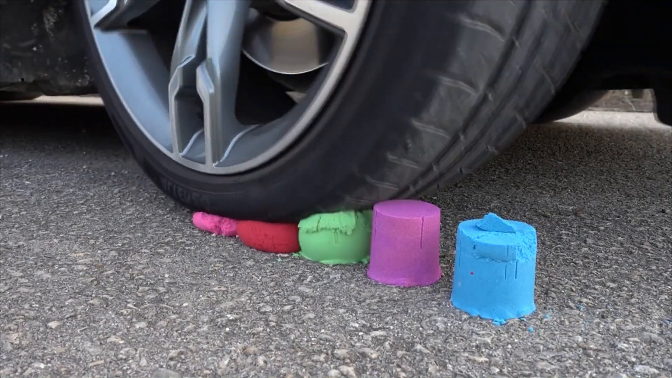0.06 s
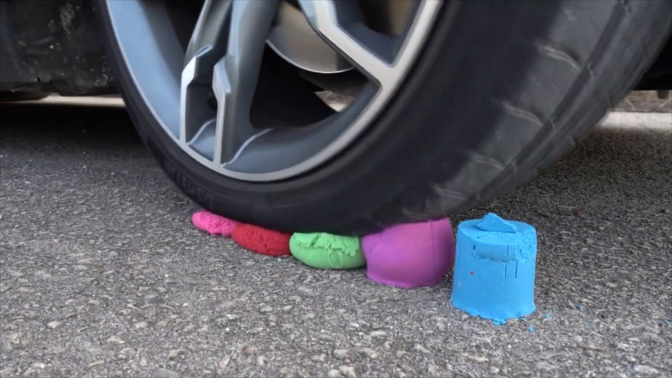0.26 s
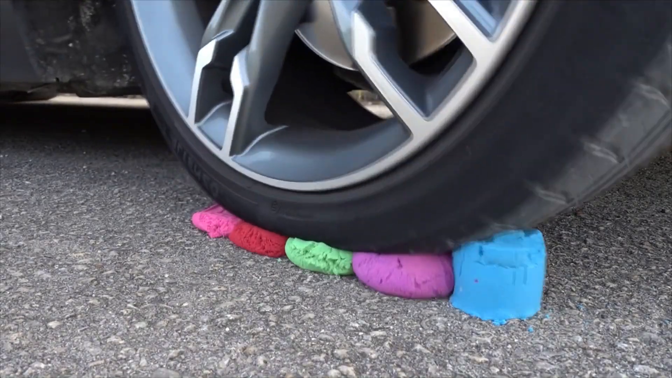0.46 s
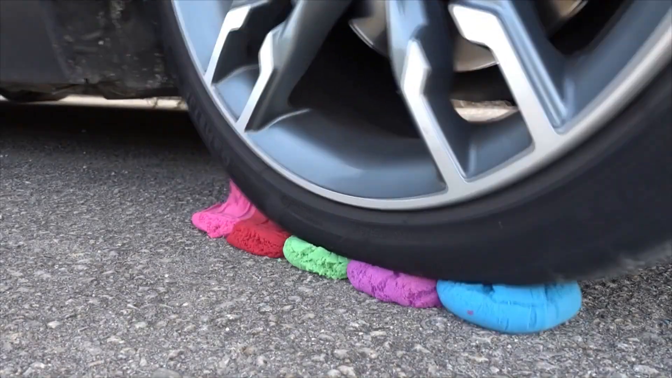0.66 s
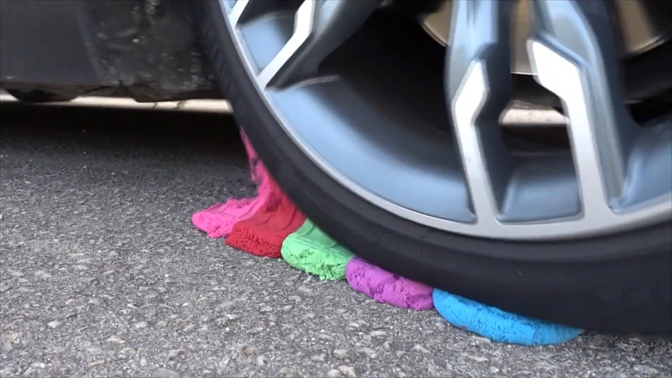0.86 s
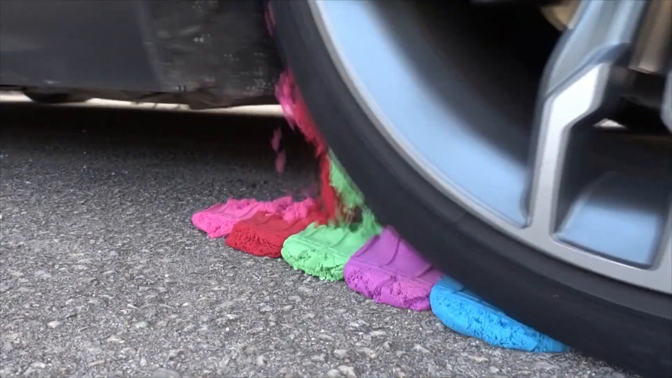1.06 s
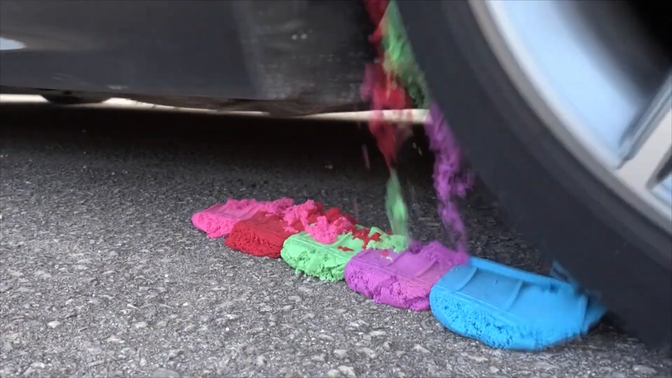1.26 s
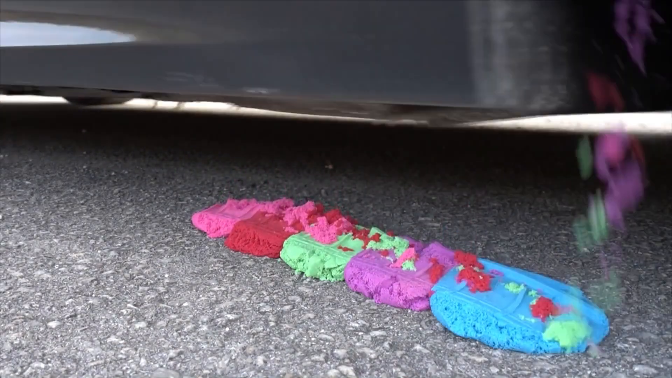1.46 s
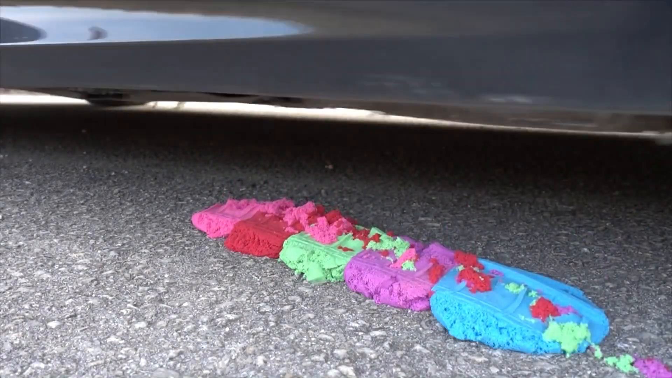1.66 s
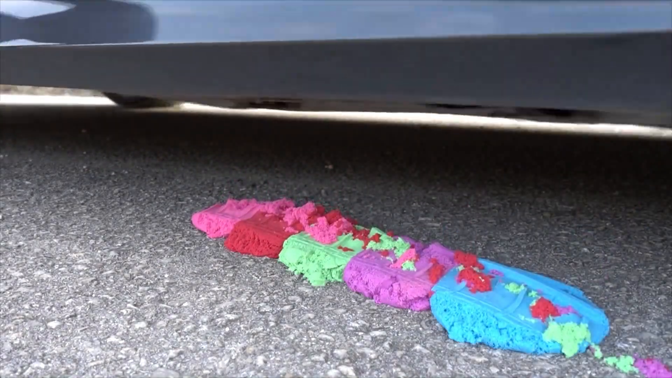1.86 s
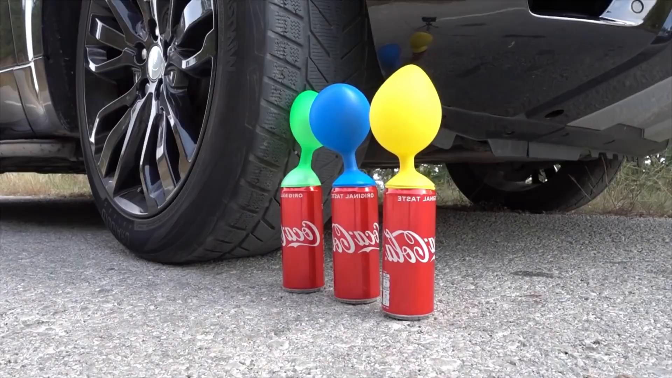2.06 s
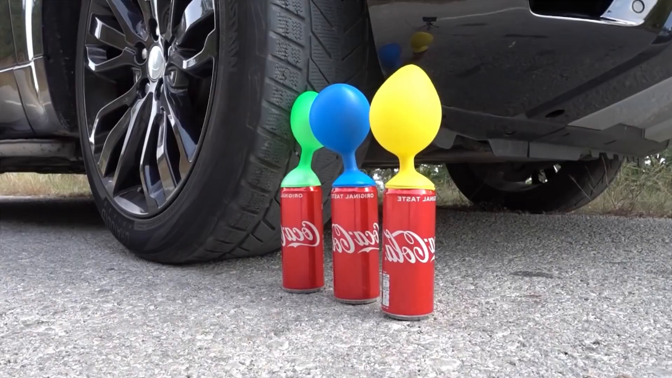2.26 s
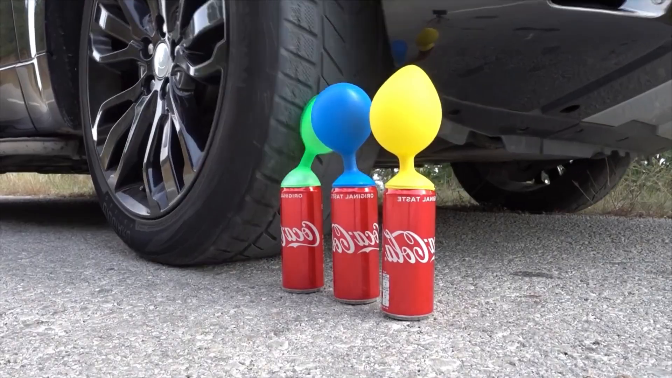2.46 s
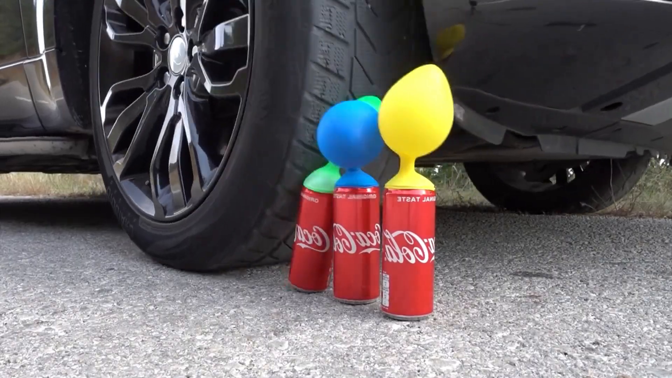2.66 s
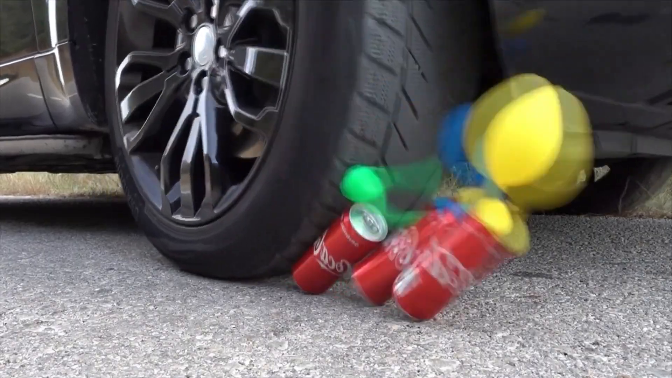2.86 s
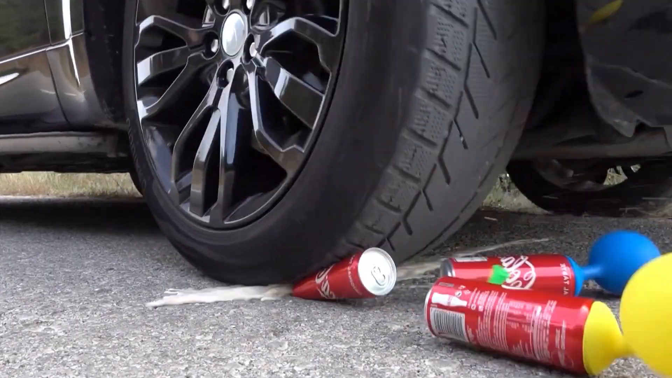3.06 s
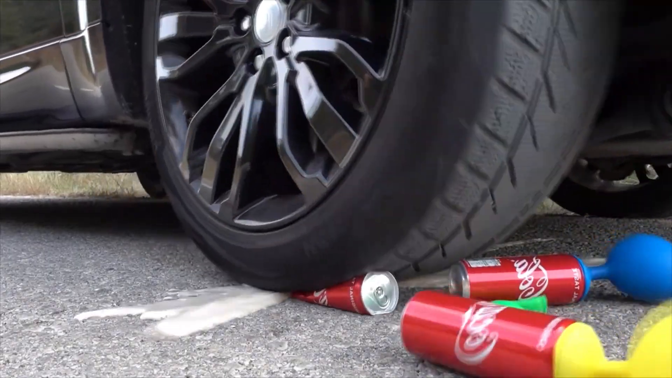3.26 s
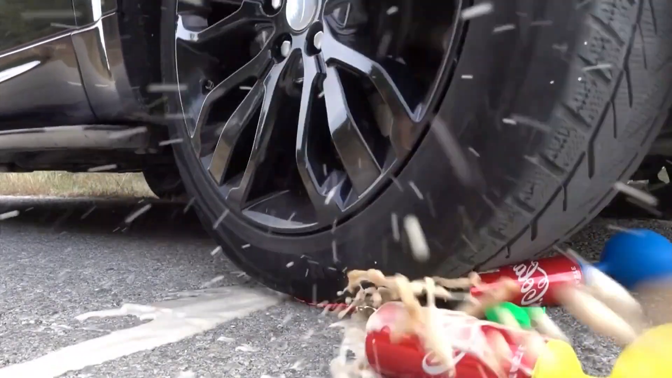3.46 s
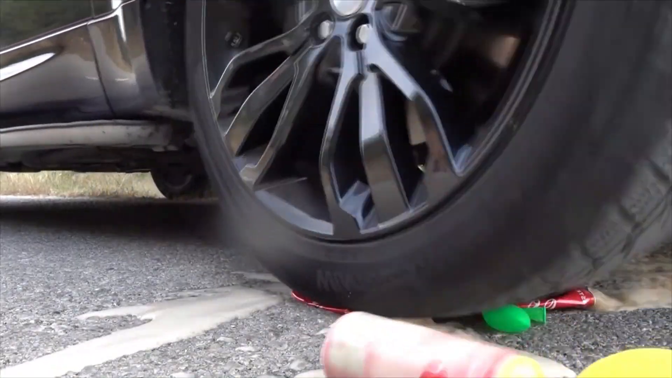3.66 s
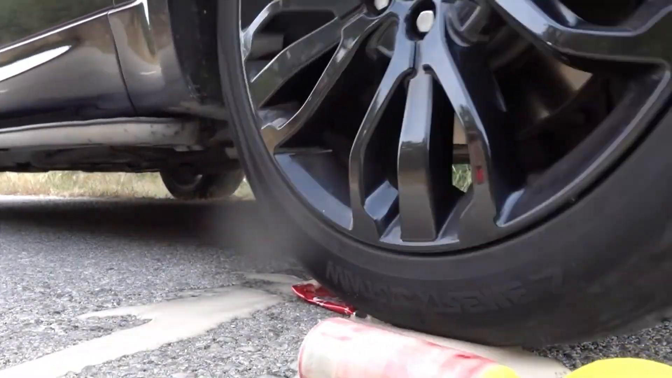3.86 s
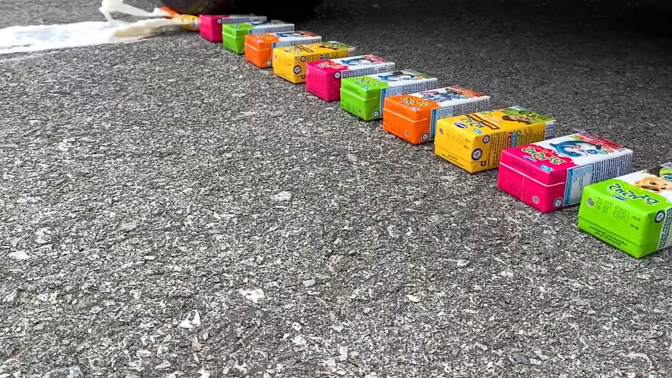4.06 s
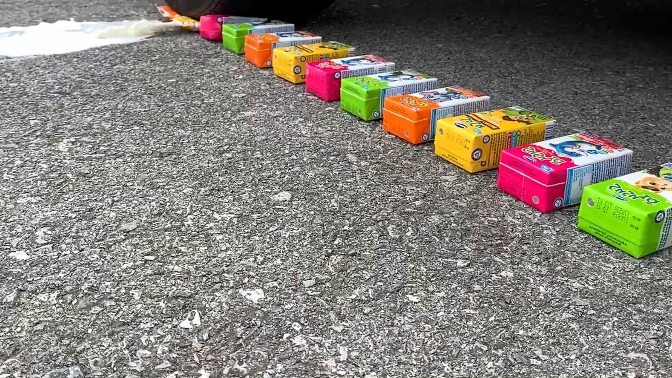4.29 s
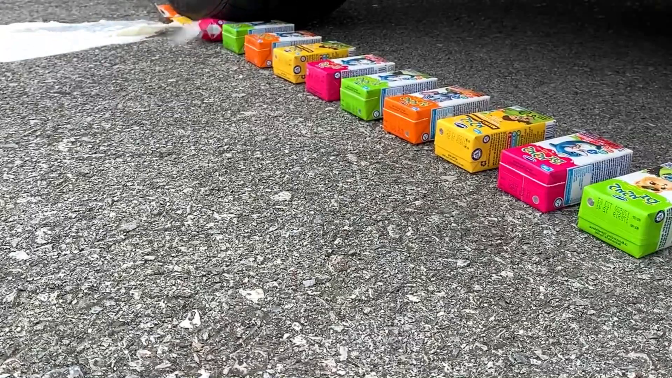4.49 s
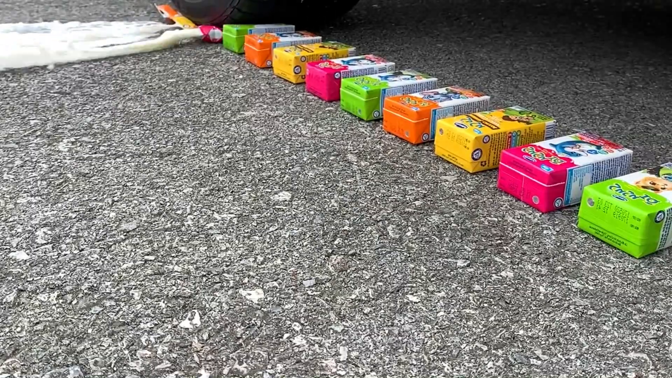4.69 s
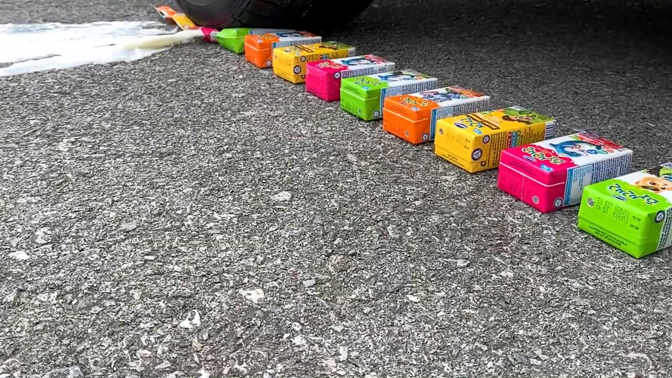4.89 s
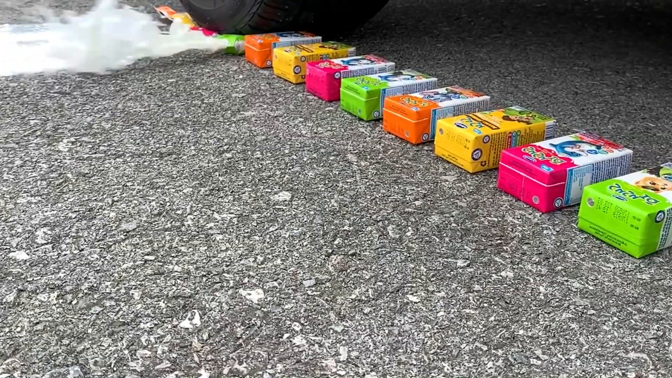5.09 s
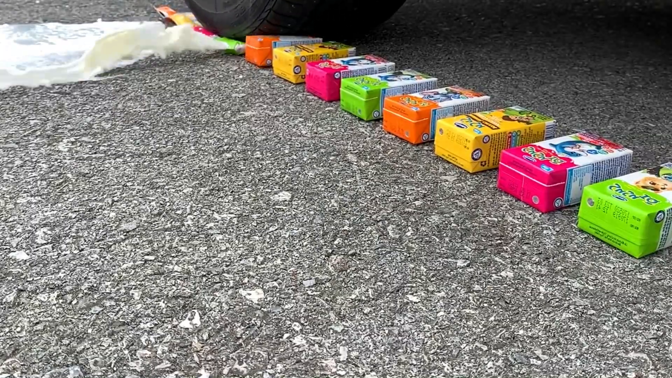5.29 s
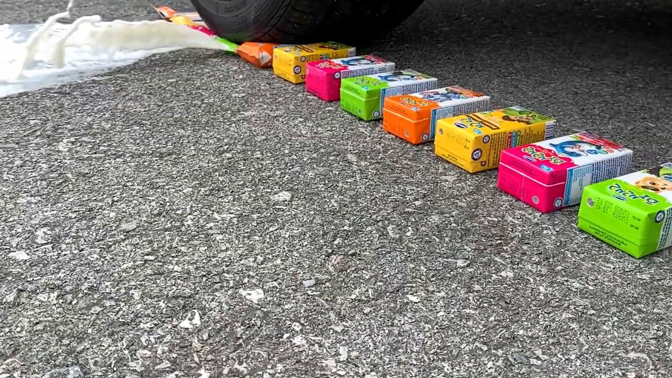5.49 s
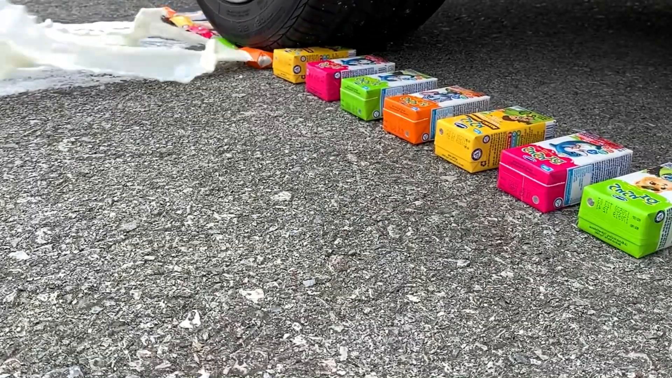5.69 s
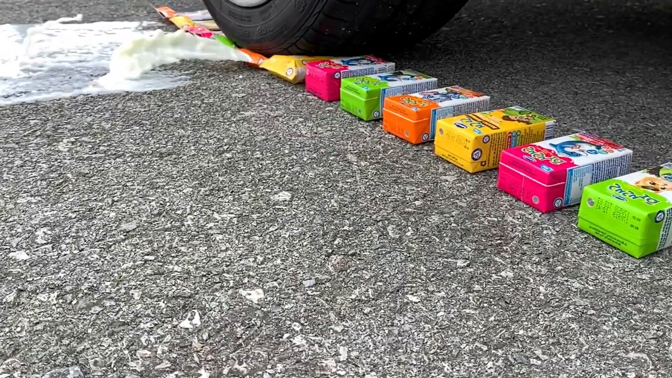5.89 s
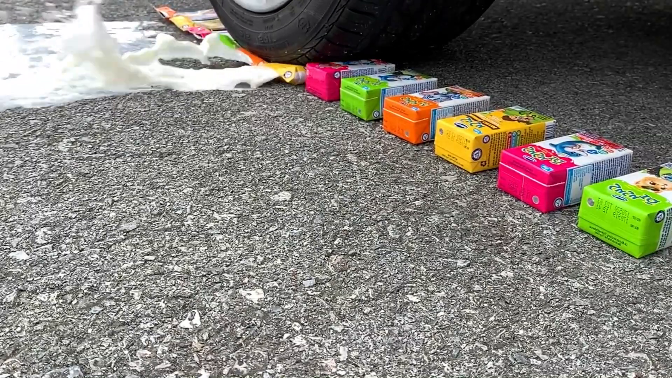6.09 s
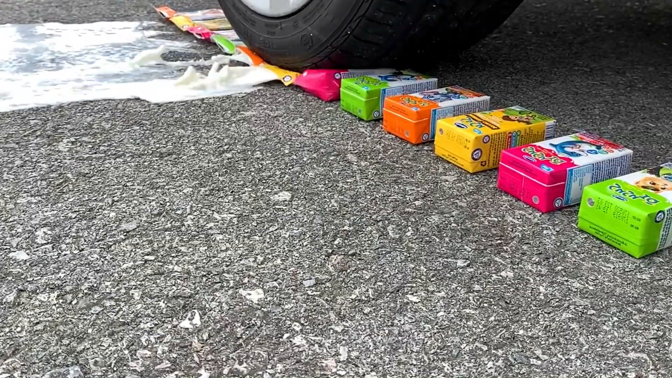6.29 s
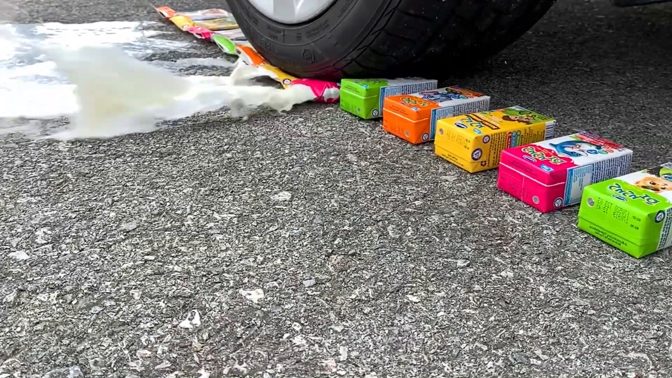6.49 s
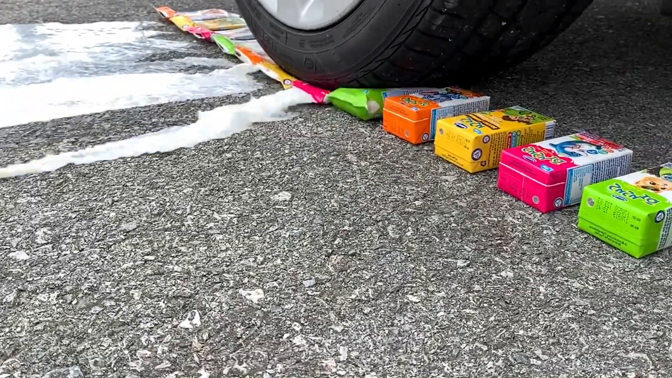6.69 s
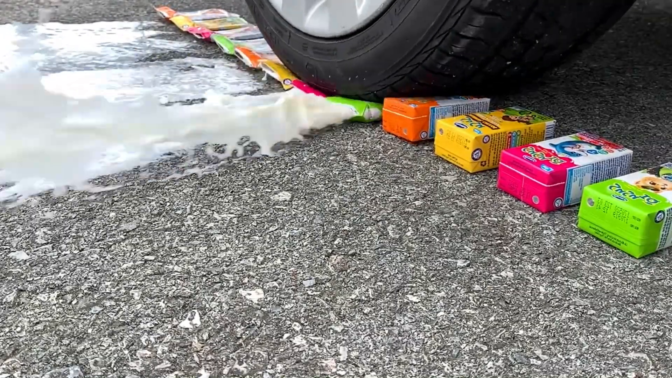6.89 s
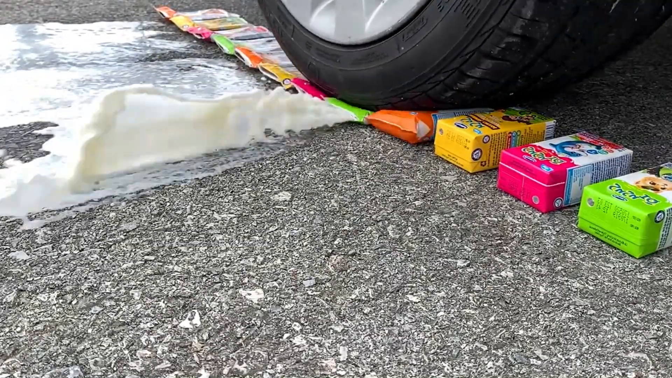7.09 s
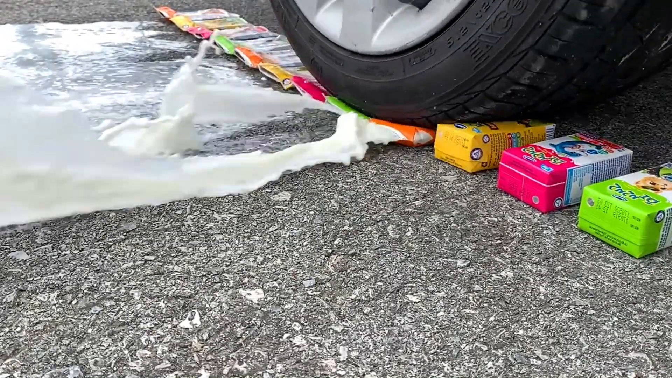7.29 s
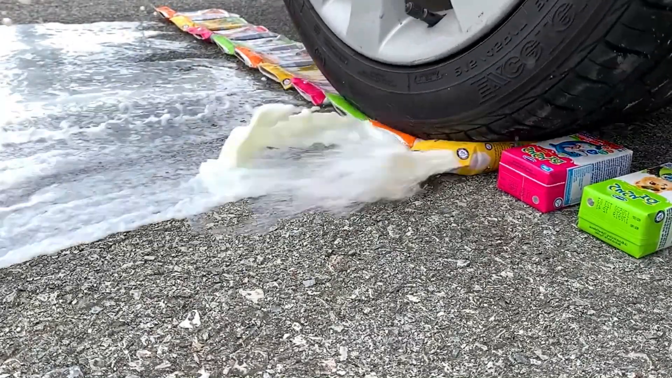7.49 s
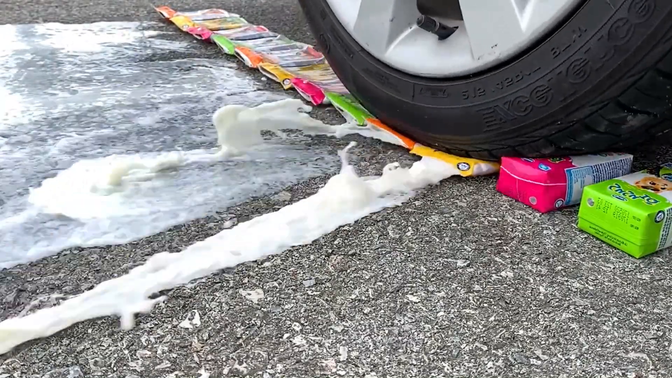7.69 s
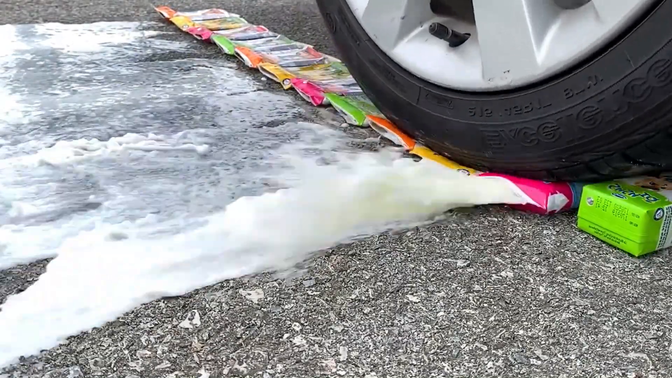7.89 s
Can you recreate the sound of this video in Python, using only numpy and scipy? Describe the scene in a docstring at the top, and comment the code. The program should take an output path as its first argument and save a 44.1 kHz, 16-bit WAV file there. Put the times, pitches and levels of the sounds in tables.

```python
"""A close pair of microphones by a car tyre rolling on asphalt, in three scenes. First cups of moulded sand squash
and grit snaps: swells of coloured noise and short bursts. Then drink cans crumple and foam beside the running car:
groaning and crinkling noise, sharp snaps, whining sines. Last, slowed down and dull, small cartons burst one after
another: each a gush of noise, a deep swing of pressure and a spray of liquid."""
import sys
import numpy as np
from scipy import signal
from scipy.fft import rfft, irfft, next_fast_len
from scipy.io import wavfile
from scipy.ndimage import uniform_filter1d, map_coordinates

SR = 44100
rng = np.random.default_rng(int(sys.argv[2]) if len(sys.argv) > 2 else 0)


def put_to_file(sound):
    """Save the sound as 16-bit audio at rate SR, in the file named by the first command-line argument."""
    columns = np.atleast_2d(sound).T  # one column per channel
    safe = np.clip(columns, -1, 1)
    whole_steps = np.round(safe * 32767)
    wavfile.write(sys.argv[1], SR, whole_steps.astype(np.int16))


N = 350398
CANS_START_S, CARTONS_START_S = 1.998, 3.927


def amp(db):
    """Decibels to gain."""
    return 10 ** (np.asarray(db) / 20)


def unit(x):
    """Scaled to rms 1."""
    return x / np.sqrt(np.mean(x ** 2) + 1e-20)


def silence():
    """An empty stereo track."""
    return np.zeros((2, N))


def clock():
    """The time of every sample in seconds."""
    return np.arange(N) / SR


def along(points, hz):
    """Value at hz between (Hz, value) points on a log frequency axis."""
    point_hz, values = np.transpose(points)
    return np.interp(np.log(hz + 1), np.log(point_hz + 1), values)


def curves(rows):
    """One value per sample for each column after the time."""
    s, *columns = np.transpose(rows)
    return [np.interp(clock(), s, column) for column in columns]


def wobble(rate, size=N):
    """A smooth random curve, rate knots a second."""
    knots = rng.standard_normal(int(size * rate / SR) + 4)
    return map_coordinates(knots, [np.arange(size) * rate / SR], order=2)


def filtered(x, response):
    """x shaped by a response given as a function of frequency."""
    n = x.shape[-1]
    padded = next_fast_len(n + 4096, True)
    spectrum = rfft(x, padded) * response(np.fft.rfftfreq(padded, 1 / SR))
    return irfft(spectrum, padded)[..., :n]


def pan(db):
    """Left and right gains for a level difference; positive is louder on the left."""
    return amp(np.outer([.5, -.5], db))


def shape(points):
    """A colour given by (Hz, dB) points."""
    return lambda hz: along(points, hz)


def hump(centre_hz, octaves):
    """A broad resonance with equal skirts per octave, over noise that falls towards the treble."""
    def colour(hz):
        distance = np.log2((hz + 1) / centre_hz) / octaves
        return -20 * np.log10(1 + distance ** 4 / 2) - 10 * np.log10(hz + centre_hz / 2)
    return colour


def grains(rate, spread_db, size=N):
    """Sizes of a stream of tiny fractures: a smooth random level with its highest peaks held down."""
    return amp(spread_db * np.minimum(wobble(rate, size), 2.2))


def crackle(rate, spread_db):
    """Sizes of separate clicks at random moments, rate a second, with silence between them."""
    struck = rng.random(N) < rate / SR
    return struck * amp(spread_db * np.minimum(rng.exponential(size=N), 3))


# How alike the two microphones hear each band, at the near tyre, the slowed cartons and the liquid.
# Columns: frequency_hz, likeness (1 = identical)
NEAR_LIKENESS = [(60, 0.93), (250, 0.87), (700, 0.39), (1500, 0.21), (4000, 0.36), (12000, 0.2)]
SLOW_LIKENESS = [(50, 0.95), (130, 0.43), (300, 0.18), (700, 0.35), (1500, 0.055)]
WET_LIKENESS = [(1000, 0.05), (2000, 0.065), (3200, 0.54)]


def rush(colour, likeness, size=np.ones(N), ripple_db=2.5, ripple_hz=30):
    """Stereo noise of rms 1: random impulses of the given sizes, coloured by a dB function of frequency."""
    knots = rng.standard_normal(8192)

    def response(hz):
        # close reflections carve fine peaks and dips into the colour
        ripple = np.interp(hz / ripple_hz, np.arange(len(knots)), knots) * hz / (hz + 200)
        turn = np.arccos(np.clip(along(likeness, hz), -1, 1)) / 2
        return amp(colour(hz) + ripple_db * ripple) * [np.cos(turn), np.sin(turn)]

    mid, side = filtered(size * rng.standard_normal((2, len(size))), response)
    return unit(np.array([mid + side, mid - side]))


def puff(colour, likeness, rough_db=0, size=16000):
    """A short piece of fresh stereo noise with resonances of its own, smooth or crunchy."""
    return rush(colour, likeness, grains(260.5, rough_db, size), ripple_db=4.0, ripple_hz=108.8)


def add(out, s, db, rise, fall, noise):
    """Lay a swell of noise that peaks at s into out."""
    before = noise.shape[-1] // 3
    offset = np.arange(noise.shape[-1]) - before
    t = offset / SR
    swell = np.exp(np.minimum(t / rise, -t / fall))
    burst = noise * swell
    # the level is set by the swell alone, whatever its noise
    burst = burst * amp(db) * np.sqrt(np.mean(swell ** 2) / np.mean(burst ** 2))
    at = round(s * SR) + offset
    inside = (at >= 0) & (at < N)
    out[:, at[inside]] += burst[:, inside]


def swells(rows, rise, fall, floor_db=-120):
    """Gain of overlapping (start_s, hold_s, level_db) swells that share a rise and a fall."""
    t = clock()[::32]
    s, hold, db = np.transpose(rows)[:, :, None]
    slope = np.minimum((t - s) / rise, (s + hold - t) / fall)
    each = amp(db) * np.exp(np.minimum(slope, 0))
    return np.interp(clock(), t, np.sqrt(np.sum(each ** 2, axis=0) + amp(floor_db) ** 2))


def patchy(x, depth_db, size):
    """Short-lived resonances come and go, as folds and films of liquid change shape."""
    spectra = signal.stft(x, nperseg=size)[2]
    field = rng.standard_normal(spectra.shape[1:])
    field = uniform_filter1d(field, size=2, axis=0)  # across frequency
    field = uniform_filter1d(field, size=4, axis=1)  # across time
    gain = unit(amp(depth_db * np.minimum(unit(field), 2)))
    return signal.istft(spectra * gain, nperseg=size)[1][:, :x.shape[1]]


def tones(lines, waver_db, waver_hz):
    """Machine tones: sines that waver in level and pitch."""
    total = 0
    for hz, db in lines:
        level = amp(db + waver_db * wobble(4.3))
        phase = 2 * np.pi * np.cumsum(hz + waver_hz * wobble(40)) / SR
        total = total + level * np.sin(phase)
    return np.sqrt(2) * total


def between(start, end):
    """1 from start to end, 0 outside, with 4 ms ramps."""
    fade_in = np.clip((clock() - start) / .004, 0, 1)
    return fade_in * np.clip((end - clock()) / .004 + 1, 0, 1)


def underbody(x, t60, wet_db):
    """Sound rattles briefly between the road and the car's floor: a decaying noise tail."""
    t = np.arange(SR // 4) / SR
    tail = rng.standard_normal((2, len(t))) * amp(-60 * t / t60) * (1 - np.exp(-t / 0.004))
    tail = tail / np.linalg.norm(tail[0])
    return x + amp(wet_db) * signal.fftconvolve(x, tail, axes=1)[:, :N]


# Tread noise of the car beside the cans. Columns: start_s, level_db
CAR_ROLL = [(2.0, -35), (2.08, -32), (2.52, -34), (2.68, -30.5), (2.9, -30.5), (3.4, -28), (3.92, -34)]
# Colour of that tread. Columns: frequency_hz, relative_db
CAR_TREAD_COLOUR = [(25, -9.5), (53, -7), (161, -2), (285, -3), (344, -5.5), (503, -1), (818, -7),
                    (1040, -7), (1740, -12), (3250, -18), (16000, -35)]
# Whine of the running car. Columns: pitch_hz, level_db (before the swell)
WHINE = [(1954, -51.5), (2345, -63.5), (2738, -62.5), (7034, -65.5)]
# The whine swells as the tyre meets the cans. Columns: start_s, gain_db
WHINE_SWELL = [(2.5, -2.5), (2.78, 7.5), (3.1, 4)]


def car():
    """Tread crunches on rough asphalt as uneven noise, under a thin whine of sines."""
    roll_db, = curves(CAR_ROLL)
    swell_db, = curves(WHINE_SWELL)
    crunch = grains(400, spread_db=1.5) * grains(25, spread_db=1.5)
    tread = amp(roll_db) * rush(shape(CAR_TREAD_COLOUR), NEAR_LIKENESS, crunch, ripple_db=3.5) * pan(1.1)
    whine = amp(swell_db) * tones(WHINE, waver_db=1.5, waver_hz=3)
    return (tread + whine) * between(CANS_START_S, CARTONS_START_S)


def sand_side_db(s):
    """Once the wheel is close, its grit falls mostly on the left microphone."""
    return np.interp(s, [.9, 1.3], [1, 6.5])


# Tyre and grit on the sand. Columns: start_s, roll_db (before a 0.5 dB lift), grit_db (before a 2.5 dB lift)
SAND_ROLL = [(0.0, -55, -65), (0.304, -62, -62.5), (0.964, -58, -60.5), (1.2, -49, -56), (1.506, -49, -53),
             (1.794, -35.5, -51.5), (1.922, -39.5, -52.5), (1.99, -48, -52)]
# Colours of the tyre and of the hissing grit. Columns: frequency_hz, relative_db
SAND_TYRE_COLOUR = [(20, -36), (40, -10.5), (90, -6.5), (125, -0.5), (180, -2), (260, -1), (400, -4),
                    (560, -3.5), (2200, -18.5), (3200, -45)]
GRIT_COLOUR = [(1000, -25.5), (1600, -3.5), (2470, -5.5), (2950, -2), (3560, -9.5), (5760, -12.5),
               (16000, -22.5)]
# Faint tones of the first car. Columns: pitch_hz, level_db
IDLE = [(125, -69), (463, -75.5), (2180, -79), (2993, -85)]


def sand_roll():
    """The tyre comes closer over sand: low rolling noise, finer hissing grit and faint car tones."""
    roll_db, grit_db = curves(SAND_ROLL)
    roll = rush(shape(SAND_TYRE_COLOUR), NEAR_LIKENESS, grains(90, spread_db=3.0), ripple_hz=34)
    grit = rush(shape(GRIT_COLOUR), NEAR_LIKENESS, grains(700, spread_db=2.0), ripple_db=1.0)
    out = amp(roll_db + 0.5) * roll * pan(1.5)
    out += amp(grit_db + 2.5) * grit * pan(sand_side_db(clock()))
    return patchy(out, depth_db=2.0, size=2048) + tones(IDLE, waver_db=5.0, waver_hz=12.5)


def sand_swells(rows, octaves, rough_db):
    """Swells of humped noise whose fall is 1.2 times their rise, the bright ones further left."""
    out = silence()
    for s, db, hz, rise in rows:
        noise = puff(hump(hz, octaves), NEAR_LIKENESS, rough_db)
        add(out, s, db, rise, rise * 1.2, noise * pan(sand_side_db(s) * hz / (hz + 500)))
    return out


# Sand giving way and tread scuffing. Columns: peak_s, level_db, centre_hz, rise_s
SCUFFS = [(0.053, -42.5, 1340, 0.0069), (0.47, -47.5, 1480, 0.016), (0.67, -37, 1970, 0.012),
          (1.009, -51, 1538, 0.06), (1.278, -37, 3290, 0.011), (1.344, -34.5, 5500, 0.0065),
          (1.43, -36.5, 980, 0.094), (1.542, -37.5, 6040, 0.0036), (1.764, -35, 1886, 0.032),
          (1.885, -37.5, 2480, .012)]


def scuffs():
    """Sand gives way and tread scuffs: broad, crunchy swells of noise."""
    return sand_swells(SCUFFS, octaves=1.4, rough_db=1.5)


# Lumps of sand squashed flat. Columns: peak_s, level_db, centre_hz, rise_s
SQUASHES = [(0.054, -50, 140, 0.0062), (0.479, -53.5, 304, 0.023), (0.834, -55, 404, .007),
            (.947, -48, 137, 0.0094), (0.949, -46, 435, 0.016), (1.008, -48.5, 493, 0.021),
            (1.041, -46, 283, 0.028), (1.14, -43, 740, 0.034), (1.714, -36.5, 228, 0.022),
            (1.799, -41.5, 318, 0.027)]


def squashes():
    """Lumps of sand go flat: lower, narrower swells of noise."""
    return sand_swells(SQUASHES, octaves=0.58, rough_db=-1)


def sand():
    """The tyre's roll, scuffs and squashes on the sand."""
    return (sand_roll() + scuffs() + squashes()) * between(-1, CANS_START_S)


# Stones snapping under the tread. Columns: peak_s, level_db, centre_hz, width_octaves, fall_s, left_right_db
STONES = [(1.2815, -22.5, 2930, 0.95, 0.00079, 6), (1.3811, -11, 1180, 0.22, 0.0041, 5),
          (1.3814, -22, 2800, 0.3, 0.0031, 9.5), (1.39, -25.5, 1120, 0.9, 0.0016, 12),
          (1.6232, -21, 4340, 0.62, 0.0018, 5), (1.9184, -18.5, 3450, 1, 0.0014, 4.5),
          (2.071, -22, 1770, .86, 0.0014, -5.5), (2.651, -26.5, 4630, 1.4, 0.0043, 2),
          (2.757, -30.5, 3970, 1.2, .005, 3)]


def stones():
    """Small stones are pinched and snap from the tread: a sharp burst, then a low knock as rubber springs back."""
    out = silence()
    for s, db, hz, octaves, fall, side_db in STONES:
        snap = puff(hump(hz, octaves), NEAR_LIKENESS, size=4096) * pan(side_db)
        knock = puff(hump(528, octaves=0.8), NEAR_LIKENESS, size=2048) * pan(3.2)
        add(out, s, db, .0003, fall, snap)
        add(out, s + .0005, db - 8, .0004, .0027, knock)
    return underbody(out, t60=0.07, wet_db=-9.0)


# The tyre folds a length of can flat. Columns: start_s, length_s, groan_db, crinkle_db (crinkle and foam)
FOLDS = [(3.015, 0.009, -24.5, -22), (3.051, 0.037, -28.5, -21), (3.127, 0.12, -33.5, -29),
         (3.403, 0.067, -24, -27.5), (3.483, 0.063, -27.5, -36.5), (3.618, 0.0091, -20.5, -31.5),
         (3.688, 0.035, -21.5, -26.5), (3.756, 0.06, -40.5, -27.5), (3.854, 0.032, -36.5, -27)]
FOLD_ATTACK_S, FOLD_RELEASE_S = 0.004, 0.025
# Colours of the hollow groan and of the crinkling metal. Columns: frequency_hz, relative_db
GROAN_COLOUR = [(35, -27), (60, 0), (145, -10), (182, -4), (243, -4.5), (380, -6.5), (669, -3.5),
                (1400, -21), (2600, -100)]
CRINKLE_COLOUR = [(530, -25), (900, -1.5), (1620, -6), (2400, -5), (3960, -7.5), (15100, -20)]


def folds():
    """Cans fold in hollow groans and creased, foaming crinkle; returns (folds, sharp little splits)."""
    groan_rows = [(s, length, db) for s, length, db, _ in FOLDS]
    crinkle_rows = [(s, length, db) for s, length, _, db in FOLDS]
    groan = swells(groan_rows, FOLD_ATTACK_S, FOLD_RELEASE_S)
    crinkle = swells(crinkle_rows, FOLD_ATTACK_S, FOLD_RELEASE_S)
    hollow = rush(shape(GROAN_COLOUR), NEAR_LIKENESS, grains(200, spread_db=5.0))
    # tiny creases come in clumps as each fold runs through the metal
    metal = rush(shape(CRINKLE_COLOUR), NEAR_LIKENESS, grains(220, spread_db=2.5))
    splits = rush(shape(CRINKLE_COLOUR), NEAR_LIKENESS, crackle(260, spread_db=1.0))
    out = groan * patchy(hollow, depth_db=6.0, size=1024)
    out += crinkle * patchy(metal, depth_db=3.0, size=1024)
    return out, crinkle * amp(-8.5) * splits


DENTS_PER_S, DENT_FALL_S = 55, .0022


def dents():
    """Each fold advances in separate coarse dents, every one a short burst with a pitch of its own."""
    out = silence()
    for start, length, groan_db, crinkle_db in FOLDS:
        count = round((length + FOLD_RELEASE_S) * DENTS_PER_S)
        chance = rng.uniform(-1, 1, (40, 3))
        for k, (late, loud, high) in enumerate(chance[:count]):
            s = start + (k + .5 + late / 2) / DENTS_PER_S
            db = (groan_db + crinkle_db) / 2 + 4.5 + 3 * loud
            noise = puff(hump(890 * 2 ** high, octaves=0.7), NEAR_LIKENESS, size=2048)
            add(out, s, db, DENT_FALL_S / 10, DENT_FALL_S, noise)
    return out


# Can walls buckling. Columns: start_s (peak 1 ms later), level_db, centre_hz, fall_s
BUCKLES = [(2.833, -26.5, 2877, .009), (2.834, -25.5, 450, .008), (2.913, -17.5, 3600, .007),
           (2.915, -16.5, 526, .009), (2.923, -14.5, 6000, .004), (3.0115, -15, 1900, .006),
           (3.021, -19, 900, .006), (3.0455, -16, 500, .009), (3.067, -21.5, 1900, .006),
           (3.136, -18.5, 601, .009), (3.1433, -18.5, 4550, .003), (3.1905, -17.5, 3840, .004),
           (3.232, -20, 4507, .003), (3.2371, -18, 7410, .0025), (3.272, -15.5, 3744, .003),
           (3.3093, -14.5, 11000, .002), (3.327, -16, 10500, .0025), (3.3887, -13.5, 8000, .0018),
           (3.4101, -19, 3453, .003), (3.411, -14.5, 398, .009), (3.4784, -24, 5500, .004),
           (3.5878, -18.5, 850, .004), (3.6092, -14, 900, .0025), (3.6655, -19.5, 1105, .005),
           (3.708, -22.5, 1000, .006), (3.855, -20.5, 3000, .0018), (3.921, -18.5, 1500, .0015)]


def buckles():
    """Thin walls snap through: broad crunchy bursts with an abrupt start."""
    out = silence()
    for s, db, hz, fall in BUCKLES:
        noise = puff(hump(hz, octaves=1.39), NEAR_LIKENESS, rough_db=3, size=4096)
        add(out, s + .001, db, .0005, fall, noise)
    return out


# A can wall rings where it is knocked. Columns: peak_s, level_db, pitch_hz
CLINKS = [(2.834, -27.5, 2814), (2.916, -26.5, 3100), (3.275, -31, 3830)]


def clinks():
    """A knocked wall rings: very narrow noise that dies in a few hundredths of a second."""
    out = silence()
    for s, db, hz in CLINKS:
        add(out, s, db, .015 / 20, .015, puff(hump(hz, octaves=0.045), NEAR_LIKENESS, size=8192))
    return out


# Trapped air and drink booming in a can. Columns: peak_s, level_db, pitch_hz, rise_s, fall_s
BOOMS = [(3.087, -23.5, 165, 0.014, 0.011), (3.151, -31.5, 184, 0.02, 0.061),
         (3.441, -22, 180, 0.015, 0.015), (3.506, -23, 195, 0.029, 0.035), (3.624, -19, 337, 0.0022, 0.018),
         (3.625, -18, 676, .002, 0.013), (3.669, -16.5, 710, .001, .009), (3.651, -26.5, 187, 0.03, 0.087),
         (3.712, -24, 117, 0.0075, 0.036)]


def booms():
    """Trapped air and drink boom: swells of narrow noise."""
    out = silence()
    for s, db, hz, rise, fall in BOOMS:
        add(out, s, db, rise, fall, puff(hump(hz, octaves=0.14), NEAR_LIKENESS))
    return out


def cans():
    """Cans crumple while the drink is squeezed out; the snaps rattle under the car."""
    folding, splits = folds()
    snaps = underbody(splits + dents() + buckles() + clinks(), t60=0.05, wet_db=-7.0)
    return (folding + booms() + snaps) * pan(2.0) * between(CANS_START_S, CARTONS_START_S)


# Cartons bursting, mostly twice each, a first split and then the main pop.
# Columns: pop_s, pop_db, pop_hz, gush_db, gush_rise_s, gush_edge_hz, splatter_db
BURSTS = [(3.939, -15.5, 38.5, -21, 0.0033, 700, -57), (4.5236, -6.5, 185.4, -15, 0.0047, 520, -27),
          (4.629, -10, 151, -17, 0.0163, 1580, -17.5), (5.0202, -13, 333, -16, 0.014, 900, -30),
          (5.147, -6, 189.3, -16, 0.016, 1100, -23.5), (5.495, -25, 138.4, -21.5, 0.0075, 560, -35),
          (5.6365, -9, 292, -20, 0.021, 900, -37), (5.976, -17, 335, -20, 0.0029, 650, -28.5),
          (6.0905, -4, 288, -20.5, 0.014, 800, -29), (6.421, -20, 200, -27, 0.0072, 480, -29.5),
          (6.536, -10.5, 310, -18.5, 0.012, 850, -25.5), (6.7795, -18, 180, -22.5, 0.0087, 800, -32),
          (6.8815, -11.5, 278, -19, 0.016, 950, -30), (7.141, -24.5, 196, -26, 0.0042, 700, -41),
          (7.239, -13.5, 127.6, -21.5, 0.022, 900, -28.5), (7.527, -36, 220, -25, 0.015, 780, -33.5),
          (7.594, -10, 281, -19, 0.012, 880, -23.5), (7.91, -22, 260, -30.5, 0.028, 500, -29)]


def gush_rows(relative_db):
    """A swell row for each burst, at a level relative to its gush."""
    return [(s, 0, gush_db + relative_db) for s, _, _, gush_db, *_ in BURSTS]


# Colour of the slowed tyre. Columns: frequency_hz, relative_db
RUMBLE_COLOUR = [(15, -32), (30, 7.5), (65, -3.5), (130, -8), (300, -10), (600, -17.5), (1200, -26.5),
                 (2000, -21), (4800, -30)]


def carton_rumble():
    """The slowed tyre rumbles low and shudders with each gush."""
    level = swells(gush_rows(-14.5), rise=0.04, fall=0.032, floor_db=-47.5)
    return level * rush(shape(RUMBLE_COLOUR), SLOW_LIKENESS, grains(40, spread_db=4.5), ripple_db=1.0)


# Creaks of cardboard and low thumps around the bursts. Columns: peak_s, level_db, centre_hz, rise_s
CREAKS_AND_THUMPS = [(3.952, -26, 596, 0.005), (4.304, -33, 756, 0.004), (4.315, -38, 221, 0.0043),
                     (4.451, -27, 170, .012), (5.05, -19.5, 150, 0.011), (5.316, -36.5, 930, 0.006),
                     (5.378, -37, 660, 0.037), (5.563, -29.5, 129, 0.0073), (5.859, -33, 810, 0.00064),
                     (6.02, -28, 203, 0.0057), (6.339, -43.5, 600, 0.0045), (6.446, -30, 244, 0.0095),
                     (6.612, -34, 65, 0.0074), (6.087, -19.5, 107, .006), (6.865, -25.5, 620, 0.0039),
                     (7.168, -29, 340, 0.0064), (7.222, -24.5, 392, 0.0039), (7.755, -39, 521, .012),
                     (7.874, -31, 190, 0.007)]


def creaks_and_thumps():
    """Creaks of cardboard and low thumps around the bursts: rough narrow swells."""
    out = silence()
    for s, db, hz, rise in CREAKS_AND_THUMPS:
        add(out, s, db, rise, .016, puff(hump(hz, octaves=0.33), SLOW_LIKENESS, rough_db=2.0))
    return out


# Air ringing in a half-empty carton. Columns: peak_s, level_db, pitch_hz
HOLLOWS = [(4.616, -24, 1116), (5.616, -21, 448), (5.624, -23.5, 324)]


def hollows():
    """Air rings in a half-empty carton: very narrow noise."""
    out = silence()
    for s, db, hz in HOLLOWS:
        add(out, s, db, .0045, .02, puff(hump(hz, octaves=0.066), SLOW_LIKENESS))
    return out


# Jets of drink squirting from split seams. Columns: start_s, length_s, level_db (before a 5 dB lift)
JETS = [(3.94, 0.032, -42.5), (4.3, 0.053, -43.5), (4.425, 0.083, -38.5), (4.62, 0.087, -44),
        (4.87, 0.088, -49), (4.983, 0.085, -35.5), (5.09, 0.22, -44.5), (5.32, 0.0724, -47.5),
        (5.465, 0.15, -37.5), (6.1, 0.03, -48), (6.34, 0.076, -48), (6.44, 0.015, -40.5),
        (6.55, 0.17, -50.5), (6.985, 0.019, -37.5), (7.08, 0.12, -49.5), (7.26, 0.13, -52.5),
        (7.62, 0.14, -51), (7.845, 0.025, -46)]
# Colour of the spray. Columns: frequency_hz, relative_db
SPRAY_COLOUR = [(700, -6), (1900, -11.5), (2050, -3.5), (4300, -2.5), (4800, -7.5)]


def spray():
    """Jets hiss from split seams over a constant faint spray, and drops land around each jet."""
    jets = swells(JETS, rise=0.007, fall=0.0077, floor_db=-57.5)
    rain = amp(-4.5) * swells(JETS, rise=0.083, fall=0.054)
    drops = grains(350, spread_db=2.6) * grains(35, spread_db=1.7)
    return np.hypot(jets, rain) * amp(5.0) * rush(shape(SPRAY_COLOUR), WET_LIKENESS, drops)


# Seams cracking open with a short spit. Columns: peak_s, level_db, centre_hz
SPITS = [(4.467, -32, 2900), (4.479, -18.5, 2600), (4.488, -33, 3000), (4.514, -24.5, 3060),
         (4.552, -28, 2520), (5.06, -26.5, 2750), (5.562, -33, 3360), (6.29, -37, 3870),
         (7.134, -36.5, 4120), (7.168, -34.5, 2700), (7.211, -37, 2000), (7.494, -33, 3880)]


def spits():
    """Seams crack open: short bright bursts."""
    out = silence()
    for s, db, hz in SPITS:
        add(out, s, db, .0019, .0048, puff(hump(hz, octaves=0.62), WET_LIKENESS, size=4096))
    return out


# Drink slapping down on the asphalt. Columns: peak_s, level_db
SPLASHES = [(4.243, -40.5), (7.428, -41.5), (7.795, -46.5)]


def splashes():
    """Drink slaps down on the asphalt: soft swells of noise."""
    out = silence()
    for s, db in SPLASHES:
        add(out, s, db, .021, .021, puff(hump(1610, octaves=0.82), WET_LIKENESS))
    return out


# Colour of splattering drink and torn cardboard. Columns: frequency_hz, relative_db
SPLATTER_COLOUR = [(300, -24.5), (700, -3), (1150, -11), (1600, -15), (2500, -8), (4800, -13)]


def splatters():
    """Drink spatters at each pop: a short wet burst."""
    out = silence()
    for s, *_, splatter_db in BURSTS:
        noise = puff(shape(SPLATTER_COLOUR), WET_LIKENESS, rough_db=0.5, size=4096)
        add(out, s - .001, splatter_db, .004, .008, noise)
    return out


def tearing():
    """Cardboard fibres tear around each burst: separate clicks at random moments."""
    level = swells(gush_rows(-22), rise=0.026, fall=0.026)
    return level * rush(shape(SPLATTER_COLOUR), WET_LIKENESS, crackle(480, spread_db=2))


# Colour of escaping drink below its edge. Columns: frequency_hz, relative_db
GUSH_COLOUR = [(20, -20), (60, 2), (110, -3), (160, 3), (230, -6.5), (350, -6), (470, -10), (750, -13),
               (1300, -18.5), (4800, -24.5)]


def gush(edge_hz):
    """The colour of escaping drink: each opening cuts it off at an edge, leaving treble 11 dB down."""
    def colour(hz):
        cut_db = -10 * np.log10(1 + (hz / edge_hz) ** 10)
        return along(GUSH_COLOUR, hz) + np.maximum(cut_db, -11)
    return colour


def pop(cycles):
    """Pressure builds, drops abruptly as the seam splits, and swings back."""
    swing = -np.cos(2 * np.pi * cycles) * np.exp(-np.abs(cycles / 0.65) ** 2.5)
    since_split = cycles + .25
    split = -np.tanh(since_split * 22) * np.exp(-np.abs(since_split) / 0.17)
    return .85 * swing + .55 * split


def bursts():
    """Each carton splits with a swing of pressure, a ripping seam and a gush that turns dull."""
    out = silence()
    for s, pop_db, hz, gush_db, rise, edge_hz, _ in BURSTS:
        near = np.abs(clock() - s) < 4 / hz
        # each pop meets the two microphones at slightly different moments
        arrival = s + np.array([[.5], [-.5]]) * rng.normal(0, 0.0003)
        out[:, near] += amp(pop_db) * pop((clock()[near] - arrival) * hz)
        rip = puff(hump(590, octaves=0.39), NEAR_LIKENESS, size=2048)
        add(out, s - .001, pop_db - 18.5, .001, .0044, rip)
        # the gush is bright while the carton is taut and peaks before the pop
        taut = puff(gush(edge_hz), SLOW_LIKENESS, rough_db=3)
        add(out, s - .005, gush_db, rise, .0085, taut)
        # the slack carton empties more dully just after
        slack = puff(gush(edge_hz * .55), SLOW_LIKENESS, size=8192)
        add(out, s + .008, gush_db - 5.5, .004, .023, slack)
    return out


# The wheel works its way along the row. Columns: start_s, left_right_db
CARTON_SIDE = [(5.6, -1), (6.4, -1), (7.9, 0)]
SLOW_TOP_HZ = 4825


def cartons():
    """Cartons swell, split and throw their drink across the road, all of it dulled by a steep treble cut."""
    body = carton_rumble() + bursts() + creaks_and_thumps() + hollows()
    wet = patchy(spray() + splatters() + spits() + splashes(), depth_db=3.0, size=1024) + tearing()
    # the spray reaches the right microphone first
    lag = 52  # samples
    wet[0] = np.pad(wet[0], (lag, 0))[:N]
    side_db, = curves(CARTON_SIDE)
    out = (body + wet) * pan(side_db) * between(CARTONS_START_S, N)
    # slowed down, the sound loses its treble
    return filtered(out, lambda hz: 1 / np.sqrt(1 + (hz / SLOW_TOP_HZ) ** 260) + amp(-56))


def scene():
    """The car, sand, stones, cans and cartons, each at its own time."""
    return car() + sand() + stones() + cans() + cartons()


def record(dry):
    """The recorder keeps nothing above its band limit."""
    return filtered(dry, lambda hz: hz < 16200)


dry = scene()
out = record(dry)
put_to_file(out)
```